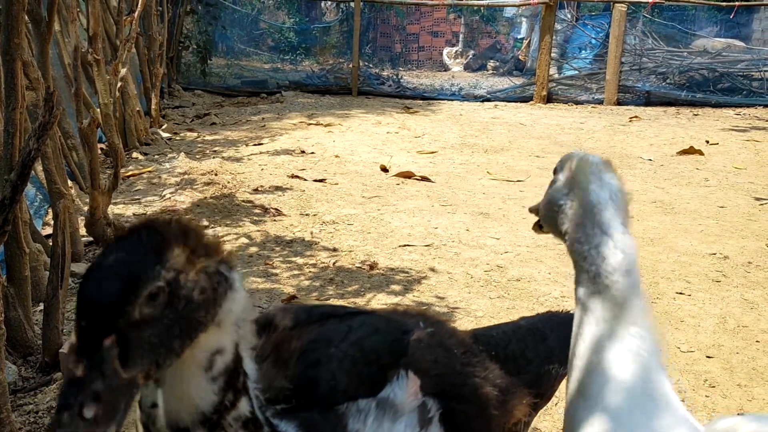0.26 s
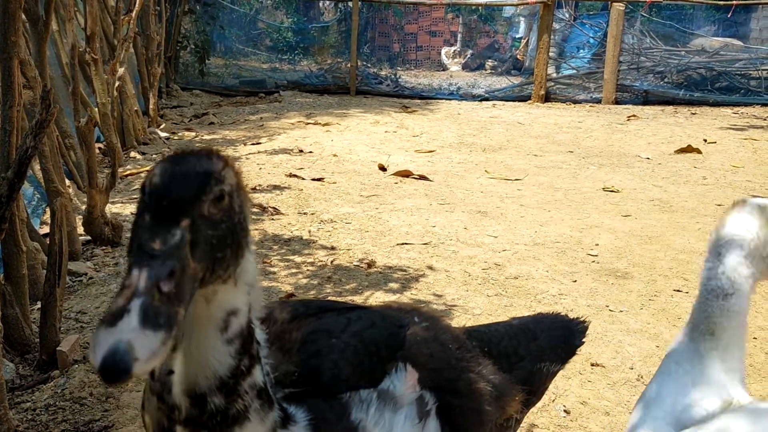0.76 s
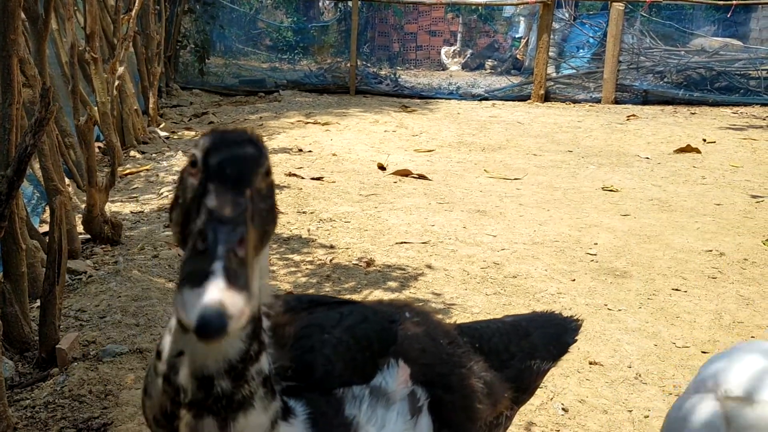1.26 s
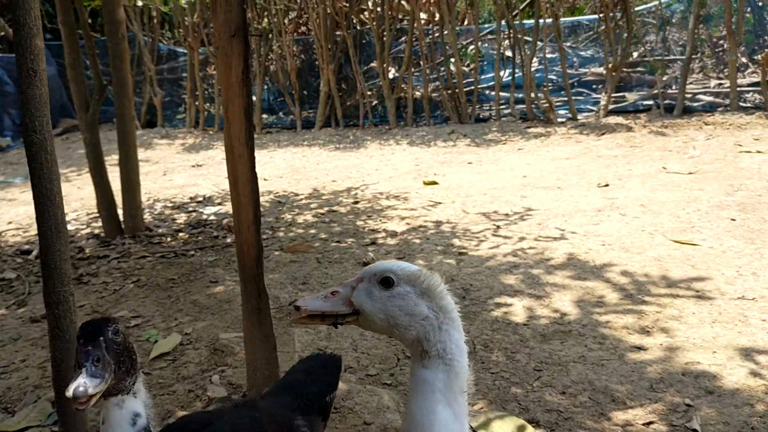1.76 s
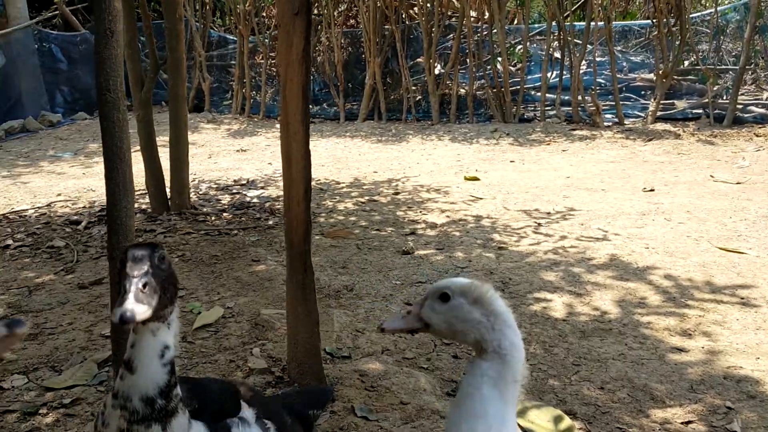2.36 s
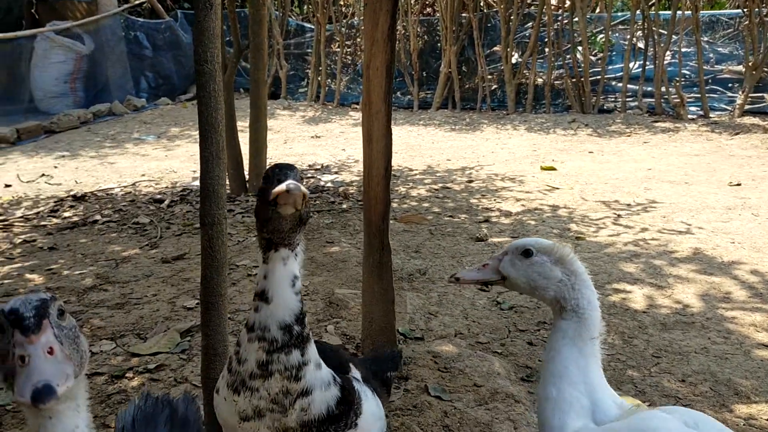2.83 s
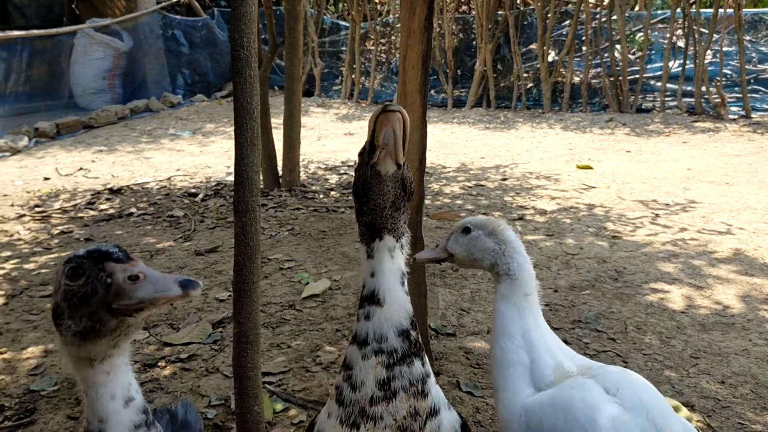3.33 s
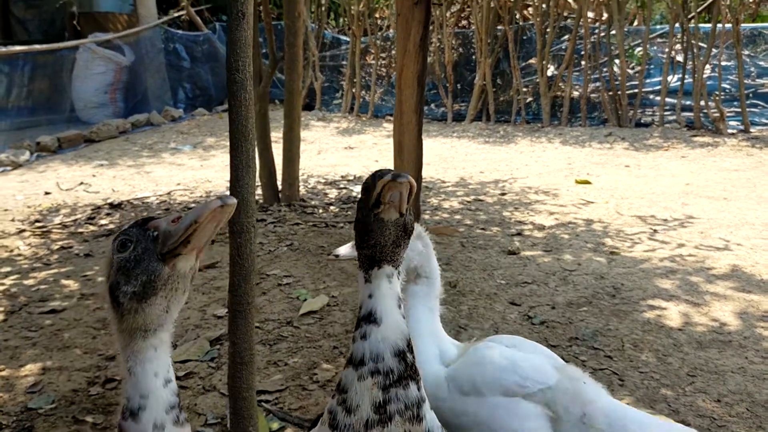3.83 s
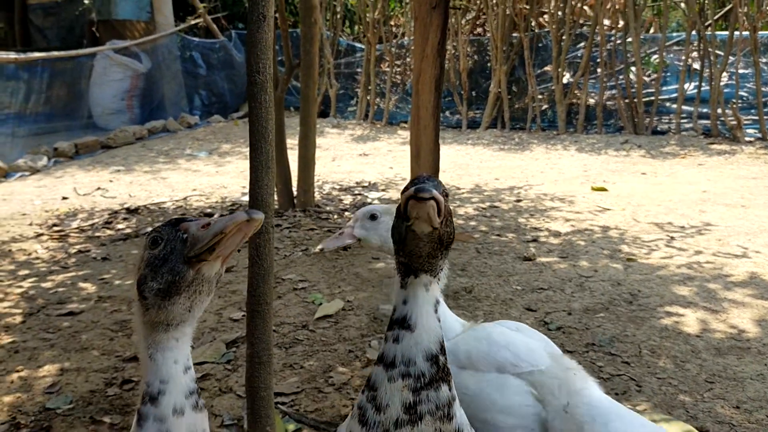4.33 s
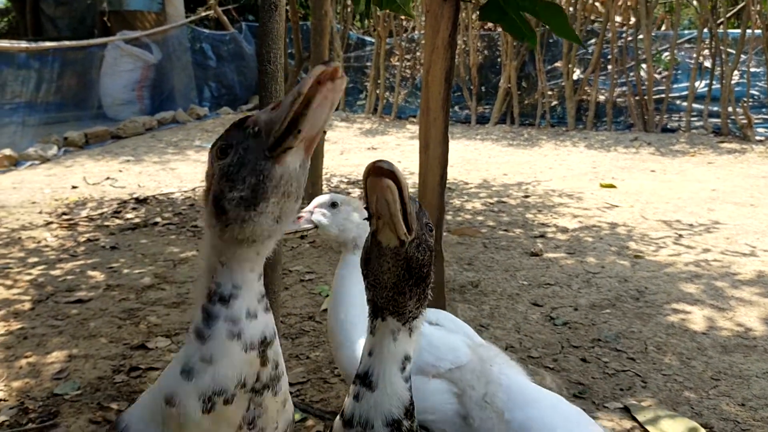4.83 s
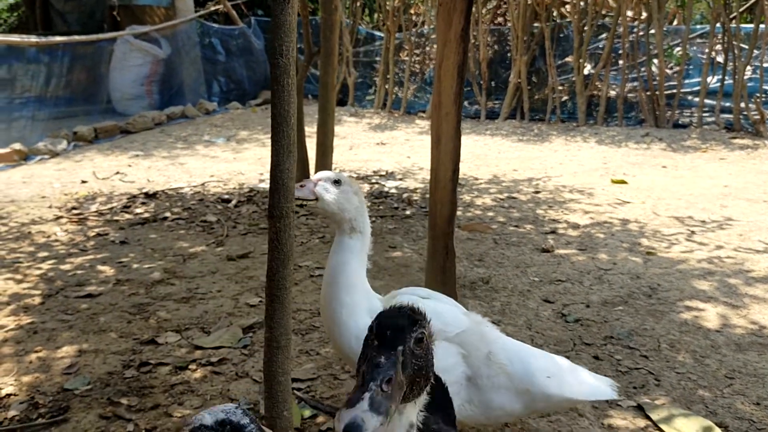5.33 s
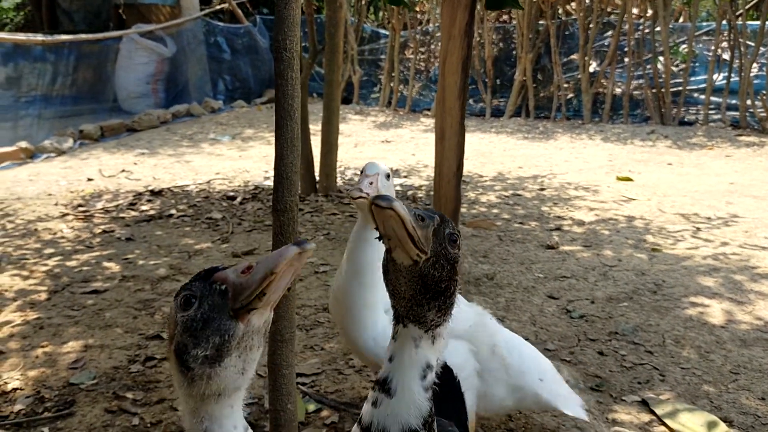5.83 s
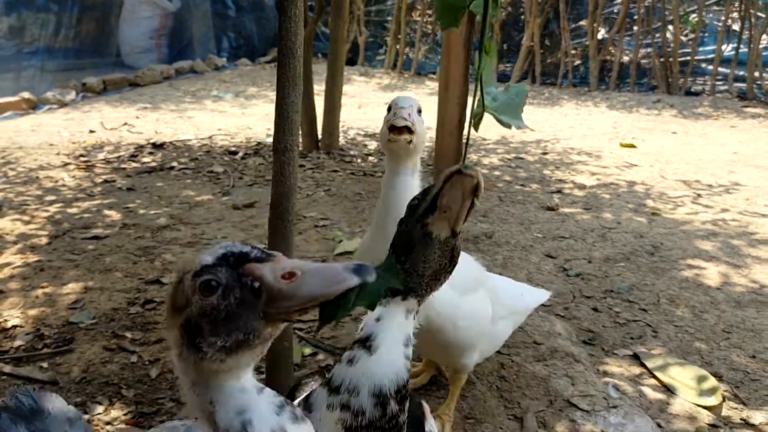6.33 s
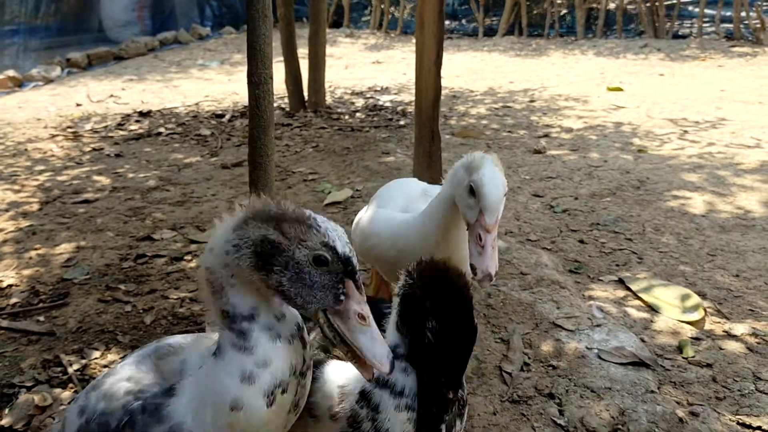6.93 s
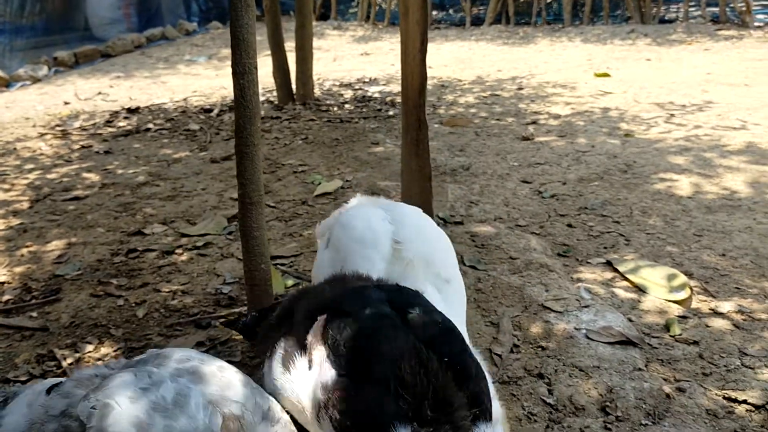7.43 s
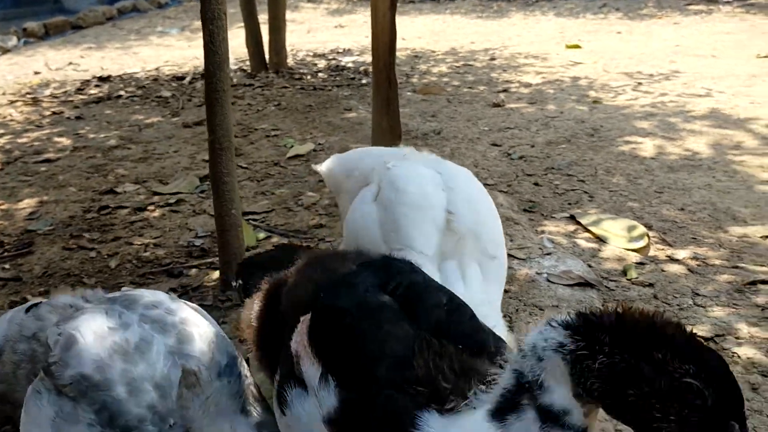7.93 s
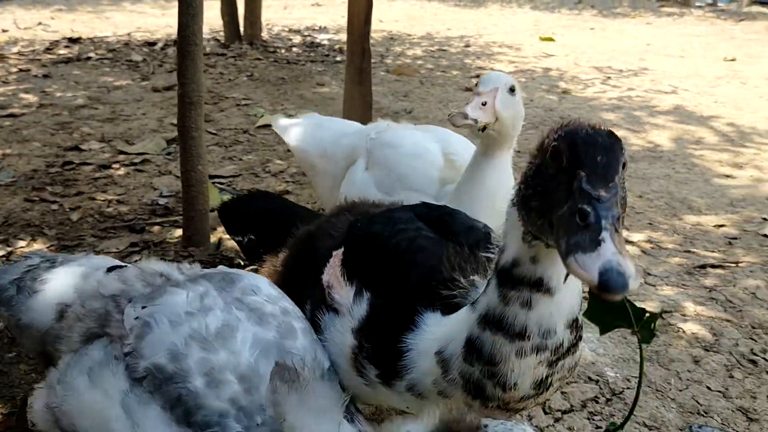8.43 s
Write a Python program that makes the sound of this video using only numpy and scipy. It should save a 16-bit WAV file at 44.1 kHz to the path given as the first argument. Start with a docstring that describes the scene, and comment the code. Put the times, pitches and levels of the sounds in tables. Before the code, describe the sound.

Close outdoor microphone in a dry yard. Ducks peep at the start over faint patter, then a click near 1.6 seconds brings a louder distant engine. A small bird alternates falling and rising notes, bills snap and leaves crinkle, loudest around five seconds with one piercing peep. The engine chugs nearer, booms briefly just before seven seconds and eases off amid more warbling peeps.

```python
"""Young ducks peep close by from the start, with fine patter underfoot and a faint one-cylinder engine.
After a click at 1.57 s the engine is louder; a small bird then repeats falling and rising notes,
bills snap among scuffed dry litter, and the engine chugs nearer, booms briefly and eases off.
Peeps, bird notes and hums are gliding sine waves; snaps, scuffs, click, patter and air are shaped noise;
the engine is a train of pulses mixed with noise."""
import sys
import numpy as np
from scipy import signal
from scipy.fft import rfft, irfft
from scipy.io import wavfile
from scipy.ndimage import uniform_filter1d

SR = 44100
rng = np.random.default_rng(int(sys.argv[2]) if len(sys.argv) > 2 else 0)


def inscribe(sig):
    """Save sig as 16-bit PCM at rate SR to the path in sys.argv[1].

    A 1-D sig is mono; a 2-D sig holds one channel per row.
    Samples are clipped to [-1, 1] before scaling.
    """
    pcm = np.round(np.clip(np.atleast_2d(sig).T, -1, 1) * 32767)
    wavfile.write(sys.argv[1], SR, pcm.astype(np.int16))


N = 382769

# Colour of bill snaps and leaf crinkles. Each row: frequency in Hz, relative level in dB.
SNAP_COLOUR = [(1500, -36), (3730, -5.5), (5220, -9.5), (6830, -3), (9370, -7.5), (14300, 0.5), (16000, 8)]
# Colour of the dull part of a blow. Each row: frequency in Hz, relative level in dB.
BODY_COLOUR = [(100, -1.5), (350, -3), (600, -6), (1200, 4.5), (1800, -1), (2800, -2.5)]


def undb(db):
    """Decibels to gain."""
    return 10 ** (np.asarray(db) / 20)


def unit(x):
    """Scale to an rms level of 1."""
    return x / np.sqrt(np.mean(x ** 2) + 1e-20)


def curves(rows):
    """Each column of a table joined by straight lines over the whole time."""
    s, *columns = np.transpose(rows)
    return [np.interp(np.arange(N) / SR, s, column) for column in columns]


def gain_at(hz, tone):
    """Gain of a (Hz, dB) colour, falling steeply beyond its ends."""
    f, db = np.transpose(tone)
    hz = np.maximum(hz, 1)
    inside = undb(np.interp(np.log(hz), np.log(f), db))
    beyond = np.minimum(1, np.minimum(hz / f[0], f[-1] / hz)) ** 3
    return inside * beyond


def colour(x, tone, size=8192):
    """Filter with the given colour and no sound ahead of time; white noise keeps its level."""
    cepstrum = irfft(np.log(gain_at(np.fft.rfftfreq(size, 1 / SR), tone) + 1e-5))
    # folding the cepstrum onto positive times makes the filter respond at once
    cepstrum[1:size // 2] *= 2
    cepstrum[size // 2 + 1:] = 0
    response = irfft(np.exp(rfft(cepstrum)))
    return signal.fftconvolve(x, response / np.linalg.norm(response))[:len(x)]


def walk(rate):
    """Random wander of rms 1, with about rate turning points a second."""
    knots = rng.standard_normal(int(N / SR * rate) + 2)
    return unit(np.interp(np.arange(N) / SR * rate, np.arange(len(knots)), knots))


def bell(s, half):
    """A smooth swell of height 1 around time s."""
    return np.exp(-((np.arange(N) / SR - s) / half) ** 2)


def add(out, s, x):
    """Mix a sound in at time s."""
    i = max(int(s * SR), 0)
    out[i:i + len(x)] += x[:max(N - i, 0)]


def glide(rows, size=220):
    """Pitch and envelope of a whistle through its turning points, with rounded corners."""
    s, hz, db = np.transpose(sorted(rows))
    t = np.arange(s[0], s[-1], 1 / SR)
    fade = np.clip(np.minimum(t - s[0], s[-1] - t) / 0.0012, 0, 1)
    pitch = uniform_filter1d(np.interp(t, s, hz), 2 * size, mode="nearest")
    level = undb(uniform_filter1d(np.interp(t, s, db), size // 2, mode="nearest"))
    return pitch, fade * level


def yard(x, t60, wet_db):
    """Fence, trunks and leaves scatter a thin tail behind the sound, dying by 60 dB in t60 seconds."""
    t = np.arange(SR) / SR
    tail = rng.standard_normal(SR) * undb(-60 * t / t60) * (t > .008)
    return x + undb(wet_db) * signal.fftconvolve(x, tail / np.linalg.norm(tail))[:N]


def ducks(count=6):
    """Warbling whistles whose hoarse overtones slide through the throat's resonances; harder calls are brighter."""
    # Throat and bill colour. Each row: frequency in Hz, gain in dB.
    throat = [(2000, 3.5), (2500, -0.5), (2670, -1), (2810, -5), (4500, -13.5), (5800, -19.5), (6700, -30),
              (8600, -19), (11000, -25), (16000, -21)]
    # late on, the voice splits at the top of a peep: a partial at one and a half times the pitch
    split_from_s, split_above_hz, split_db = 7.09, 2850, -17.5
    hoarse_rad = .22  # phase roughness, multiplied by the overtone's number
    pitch, effort, overtone_level = peeping()
    on = np.flatnonzero(effort)
    hz = pitch[on]
    waver = 0.0084 * walk(700)[on]
    flutter = undb(2.5 * walk(220)[on])
    split_height = np.clip((hz - split_above_hz) / 20, 0, 1)
    split = (on / SR > split_from_s) * split_height * undb(split_db + 2.8 * walk(50)[on])
    phase = 2 * np.pi * np.cumsum(hz * (1 + waver)) / SR
    whistle = gain_at(hz, throat) * (np.sin(phase) + split * np.sin(phase + phase / 2))
    grit = walk(1100)[on]
    overtones = 0
    for k in range(2, count + 1):
        partial = np.sin(k * phase + hoarse_rad * k * grit)
        overtones = overtones + gain_at(k * hz, throat) * partial * (1 + 0.33 * walk(900)[on])
    bright = np.sqrt(np.minimum(effort[on] / undb(-53), 1))
    out = np.zeros(N)
    out[on] = flutter * (effort[on] * whistle + overtone_level[on] * bright * overtones)
    return yard(out, t60=0.11, wet_db=-16.5)


def peeping():
    """Pitch, effort and overtone strength of the ducks' voice; peeps that touch run together into a warble."""
    # Each row: top of the pitch in seconds, rise in seconds, fall in seconds, top pitch in Hz,
    # effort in dB, loudest moment in seconds after the top, overtones in dB against the effort.
    peeps = [ (0.028, 0.03, 0.019, 2950, -35.5, -0.02, -6.5), (0.076, 0.033, 0.015, 2880, -35, -0.027, -5),
             (1.728, 0.035, 0.016, 2580, -45, -0.0036, 4), (1.773, 0.032, 0.021, 2820, -35.5, -0.0065, 2),
             (2.028, 0.037, 0.02, 2570, -40, -0.0054, 4.5), (2.056, 0.019, 0.017, 2960, -38.5, -0.004, 7),
             (2.09, 0.012, 0.015, 2220, -46.5, -0.0021, 2), (4.1, 0.019, 0.017, 2475, -42, 0.035, 6),
             (4.131, 0.018, 0.018, 2890, -27.5, -0.0095, -3.5),
             (4.174, 0.026, 0.018, 2916, -26.5, -0.013, -0.5),
             (5.119, 0.028, 0.018, 2595, -40.5, 0.0093, -15),
             (5.156, 0.022, 0.033, 2880, -32, -0.0071, -12),
             (5.199, 0.022, 0.018, 2875, -13.5, -0.0042, -10), (7.075, 0.032, 0.018, 3240, -33, -0.0028, 2),
             (7.112, 0.029, 0.027, 2980, -24.5, -0.0009, -8), (7.156, 0.027, 0.026, 2960, -23, -0.009, -14),
             (7.199, 0.033, 0.021, 2940, -30.5, -0.0026, -1.5),
             (7.498, 0.011, 0.016, 2914, -34.5, -0.0012, -7),
             (7.523, 0.013, .025, 2504, -36.5, -0.0018, -16), (7.598, 0.033, 0.018, 2920, -34, -0.01, 1.5),
             (7.639, 0.019, 0.02, 2864, -35.5, -0.0035, -13), (7.685, 0.027, 0.024, 2963, -34, -0.0073, 2),
             (7.741, 0.03, 0.0171, 2586, -36.5, -0.0042, -20)]
    # One-way chirps. Each row: start in seconds, length in seconds, first pitch in Hz, last pitch in Hz,
    # effort in dB, overtones in dB against the effort.
    chirps = [(0.592, 0.025, 3220, 2240, -40.5, -15), (.85, 0.021, 3370, 2300, -46, -23),
              (1.605, .075, 1846, 2620, -62.5, -8), (5.39, 0.035, 1996, 3490, -40, -4),
              (5.475, 0.031, 2100, 3510, -39, -3.5), (5.532, 0.028, 2220, 3240, -46, -2)]
    # a peep arches up from the resting pitch and back, with soft ends
    rest_hz, arch_steepness, arch_power, edge_db, fade_s = 2173, 1.9, 2.4, -47.5, .003
    overtone_swell = 0.43  # power of the arch: overtones swell towards its top
    chirp_bend = 1.5  # a chirp is steepest at its high end
    hz, effort, overtones = np.full(N, float(rest_hz)), np.zeros(N), np.zeros(N)
    for s, rise, fall, top_hz, db, loudest, overtones_db in peeps:
        t = np.arange(max(-2 * rise, -s), 2 * fall, 1 / SR)
        arch = np.exp(-arch_steepness * np.abs(t / np.where(t < 0, rise, fall)) ** arch_power)
        add(hz, s + t[0], (top_hz - rest_hz) * arch)
        peak = np.clip(loudest, -rise, fall)
        off_peak = np.interp(t, [-rise, peak, fall], [-1, 0, 1])  # 0 where it is loudest
        fade = np.clip(np.minimum(t + rise, fall - t) / fade_s + .5, 0, 1)
        push = fade * undb(db - max(db - edge_db, 11) * off_peak ** 2)
        add(effort, s + t[0], push)
        add(overtones, s + t[0], push * undb(overtones_db) * arch ** overtone_swell)
    for s, length, first_hz, last_hz, db, overtones_db in chirps:
        n = int(length * SR)
        ramp = np.linspace(0, 1, n) if last_hz > first_hz else np.linspace(1, 0, n)
        height = ramp ** chirp_bend
        add(hz, s, min(first_hz, last_hz) - rest_hz + abs(last_hz - first_hz) * height)
        push = undb(db) * signal.windows.tukey(n, .5)
        add(effort, s, push)
        add(overtones, s, push * undb(overtones_db))
    return hz, effort, overtones


def cluck():
    """A hoarse low note broken into bursts, each bending upward, with a rough upper resonance above it."""
    # Each row: start in seconds, length in seconds, pitch in Hz, level in dB,
    # upper resonance in Hz, its level in dB against the pitch.
    bursts = [(2.266, 0.017, 770, -53, 1940, 5.5), (2.279, .02, 922, -42, 2700, -7),
              (2.303, 0.027, 1017, -47.5, 2360, -8)]
    out = np.zeros(N)
    rasp, grate, rattle = .09 * walk(1200), .1 * walk(2000), undb(3 * walk(400))
    for s, length, hz, db, upper_hz, upper_db in bursts:
        n = int(length * SR)
        here = int(s * SR) + np.arange(n)
        bend = 1 + 0.19 * np.linspace(-.5, .5, n)
        low = np.sin(2 * np.pi * np.cumsum(hz * (bend + rasp[here])) / SR)
        upper = np.sin(2 * np.pi * np.cumsum(upper_hz * (bend + grate[here])) / SR)
        envelope = undb(db) * signal.windows.tukey(n, .5) * rattle[here]
        add(out, s, envelope * (low + undb(upper_db) * upper))
    return yard(out, t60=0.06, wet_db=-10)


def snaps():
    """A bill closes or a stalk breaks: a sharp pulse with a brief crackle, and a duller knock that rings."""
    # Each row: start in seconds, level in dB, body in dB against the treble.
    blows = [(2.354, -30.5, -26), (2.378, -33.5, -9.5), (2.857, -38, -3.5), (3.272, -32, -39),
             (3.38, -30, -36), (3.51, -31, -27), (4.466, -26, -13.5), (4.851, -27, -12.5),
             (4.8738, -22, -20), (4.89, -22, -24), (5.016, -24, -32), (5.0206, -20, -24),
             (5.0732, -17, -29), (6.24, -25, -13.5), (6.281, -25, -22), (8.322, -26, -18),
             (8.449, -27.5, -15.5)]
    ring_hz, ring_decay_s, ring_db = 3870, 0.00048, 14.5  # ring level is against the body
    # the hardest snap also sets off a low hollow knock
    hollow_s, hollow_hz, hollow_db, hollow_decay_s = 5.076, 430, -38, 0.0047
    crack, knock, ring = np.zeros(N), np.zeros(N), np.zeros(N)
    t = np.arange(SR // 20) / SR
    for s, db, body_db in blows:
        blow = 4.4 * (t == 0) + np.exp(-t / 0.0023) * rng.standard_normal(len(t))
        add(crack, s, undb(db) * blow)
        add(knock, s, undb(db + body_db) * blow)
        ringing = np.exp(-t / ring_decay_s) * np.sin(2 * np.pi * ring_hz * t)
        add(ring, s, undb(db + body_db + ring_db) * ringing)
    hollow = np.exp(-t / hollow_decay_s) * np.sin(2 * np.pi * hollow_hz * t)
    add(ring, hollow_s, undb(hollow_db) * hollow)
    return colour(crack, SNAP_COLOUR) + colour(knock, BODY_COLOUR) + ring


def scuffs_and_click():
    """Bursts of grainy noise: dry leaves and grit are brushed; the one at 1.567 s is only a short click."""
    # Each row: peak in seconds, level in dB, rise in seconds, decay in seconds, body in dB against the treble.
    # The row at 1.567 s is the click, the others are scuffs.
    bursts = [(1.475, -43.5, 0.0032, 0.0085, -25), (1.567, -27.5, 0.00085, 0.0039, -16.5),
              (1.807, -32, 0.014, 0.0094, -9.5), (1.822, -36.5, 0.0051, 0.02, -13.5),
              (1.921, -37, 0.011, 0.0092, -18.5), (2.372, -42, 0.0087, 0.031, -7.5),
              (3.081, -43, 0.0019, 0.014, -10.5), (3.426, -35.5, 0.021, 0.032, -15),
              (3.496, -22, 0.0036, 0.011, -12), (4.401, -37, 0.0029, 0.0037, -6),
              (5.077, -34, 0.00047, 0.0068, -4.5), (6.204, -36.5, 0.035, 0.019, -14),
              (6.28, -43.5, 0.044, 0.1, -6), (8.312, -20.5, 0.0019, 0.0056, -19.5)]
    # Colour of dry litter, lent to the click too. Each row: frequency in Hz, relative level in dB.
    litter_colour = [(1500, -18.5), (2910, -4), (4370, -1.5), (4830, -12), (6760, -2.5), (8570, -6.5),
                     (15100, 2.5)]
    crisp, dull = np.zeros(N), np.zeros(N)
    t = np.arange(-SR // 5, SR // 4) / SR
    for s, db, rise, decay, body_db in bursts:
        envelope = undb(db) * np.exp(-np.abs(t) / np.where(t < 0, rise, decay))
        add(crisp, s + t[0], envelope)
        add(dull, s + t[0], envelope * undb(body_db))
    grain = unit(undb(3.2 * walk(700)))
    crisp_noise = colour(crisp * grain * rng.standard_normal(N), litter_colour)
    return crisp_noise + colour(dull * grain * rng.standard_normal(N), BODY_COLOUR)


def bird():
    """Two pure notes in turn, a little different each time, smeared by the trees; the rising one most."""
    # Starts of the rising and of the falling notes, in seconds.
    rise_starts, fall_starts = [2.365, 2.743, 3.109, 3.511, 3.914, 4.308, 4.772, 5.154, 5.532, 5.957, 6.35,
                                7.24], [2.112, 2.499, 2.876, 3.26, 3.647, 4.041, 4.447, 4.902, 5.29,
                                               5.676, 6.082, 6.944, 7.395]
    # Their shapes. Each row: seconds into the note, pitch in Hz, level in dB.
    rise_shape, fall_shape = [(0, 2433, -60), (.011, 3640, -52.5), (0.023, 4660, -51.5), (.036, 5450, -52),
                              (0.047, 5280, -74)], [(0, 3790, -79), (.014, 3400, -49), (.052, 2982, -46.5),
                                            (0.08, 2670, -62.5)]
    faint_from_s, faint_db = 6.25, -2.5  # the last notes are fainter
    rising, falling = np.zeros(N), np.zeros(N)
    for out, starts, shape in ((rising, rise_starts, rise_shape), (falling, fall_starts, fall_shape)):
        hz, envelope = glide(shape)
        for s, chance in zip(starts, rng.standard_normal(len(starts))):
            note = np.sin(2 * np.pi * np.cumsum(hz * (1 + 0.0073 * chance)) / SR)
            add(out, s, undb(faint_db * (s > faint_from_s)) * envelope * note)
    return yard(rising, t60=0.45, wet_db=-0.5) + yard(falling, t60=0.4, wet_db=-4.5)


def engine():
    """Firings thump and bark from the exhaust, metal clatters in step, the casing rings; most fade with distance."""
    # Each row: time in seconds, firings per second.
    speed = [(1.7, 22.8), (3.4, 23.4), (4.05, 24.1), (5.46, 24.7), (6.3, 25.3), (6.6, 25.9), (7.1, 26.1),
             (8.68, 25.5)]
    # Level of the deep thump. Each row: time in seconds, level in dB.
    thump_level = [(0.0, -78), (6.02, -54), (6.41, -63), (6.58, -48.5), (6.89, -44.5), (8.0, -55),
                   (8.27, -53)]
    # Bark's upper half against its lower half. Each row: time in seconds, extra level in dB.
    bark_tilt = [(5.3, 5), (6.1, 8), (6.85, 5.5), (7.45, 8.5), (8.2, 10.5)]
    # Colours of the bark, the clatter and the casing's hollow ring. Each row: frequency in Hz, relative level in dB.
    bark_colour, clatter_colour, casing_colour = [(65, -25.5), (100, 3.5), (130, 5.5), (180, -1.5),
                                                  (300, -16), (700, -44)], [(300, -3), (440, -8), (745, -8),
                                                                     (1040, -10.5), (2380, -5),
                                                                     (5100, -19.5), (7500, -24)], [(700, -29.5),
                                                                                           (850, 4),
                                                                                           (1060, 4.5),
                                                                                           (1280, -6),
                                                                                           (1600, 1.5),
                                                                                           (1850, -24)]
    # Running hums. Each row: frequency in Hz at hum_rate firings per second, level in dB at the closest point.
    hums, hum_rate = [(403, -59.5), (1065, -61), (1595, -59.5)], 26
    # steady pass: time and distance of the closest point, and pace in metres per second
    pass_s, pass_m, pace_m_s = 7.24, 7.97, 10.13
    faint_until_s, faint_db = 1.57, -17  # until then all but the thump is fainter
    # brief boom of the bark; clatter and casing rise by half as many dB
    boom_s, boom_half_s, boom_db = 6.77, 0.25, 5.5
    bark_db, clatter_db, casing_db = -47.5, -47, -51.5  # at the closest point, before the boom
    clatter_falloff, casing_falloff = 1.167, 1.74  # powers of the distance: these carry less far
    gas_db = -13  # hiss of exhaust gas against the firings

    rate, = curves(speed)
    t = np.arange(N) / SR
    near = pass_m / np.hypot(pass_m, pace_m_s * (t - pass_s)) * undb(faint_db * (t < faint_until_s))
    cycles = np.cumsum(rate) / SR
    fired = np.flatnonzero(np.diff(np.floor(cycles)))
    pulses = np.zeros(N)
    pulses[fired] = undb(0.33 * rng.standard_normal(len(fired)))
    gas = unit(pulses) + undb(gas_db) * rng.standard_normal(N)

    deep = colour(gas, [(22, -35), (36, -11.5), (51, -1.5), (75, -20.5)])
    thump = unit(deep) * undb(curves(thump_level)[0])
    boom = undb(boom_db * bell(boom_s, boom_half_s))
    bark = unit(colour(gas, bark_colour)) * undb(bark_db) * boom
    lower = signal.sosfiltfilt(signal.butter(4, 140, fs=SR, output="sos"), bark)
    tilt = undb(curves(bark_tilt)[0] / 2)  # half the tilt goes to each side
    bark = lower / tilt + (bark - lower) * tilt

    hum = 0
    for hz, db in hums:
        level = undb(db + 2 * walk(10))
        hum = hum + level * np.sin(2 * np.pi * hz * cycles / hum_rate + walk(17))
    beat = 1 + .5 * np.exp(-(cycles % 1) / 0.96)  # a little louder at each firing
    rattling = rng.standard_normal(N) * beat * undb(1.07 * walk(9))
    clatter = unit(colour(rattling, clatter_colour)) * undb(clatter_db) * np.sqrt(boom)
    casing = unit(colour(rng.standard_normal(N) * beat, casing_colour)) * undb(casing_db) * np.sqrt(boom)
    return thump + near * bark + near ** clatter_falloff * clatter + near ** casing_falloff * (casing + hum)


def patter():
    """Fine crackle of feet and feathers, coming in little flurries, with brief bright crinkles of single leaves."""
    # Flurries. Each row: peak in seconds, level in dB, half length in seconds.
    flurries = [(1.09, -64.5, 0.18), (2.1, -64.5, 0.46), (3.1, -59, 0.2), (4.44, -62, 0.63),
                (5.058, -55.5, .16), (5.55, -56, 0.33), (6.66, -49, 0.35), (7.7, -49, 0.5),
                (8.37, -45.5, 0.21)]
    # The loudest crinkles. Each row: middle in seconds, level in dB.
    loud_crinkles = [(0.62, -48.5), (2.957, -41), (4.935, -34.5), (5.326, -38.5), (5.651, -38.5),
                     (6.8, -33.5), (7.947, -40), (8.287, -38), (8.365, -33)]
    # Colour of the patter. Each row: frequency in Hz, relative level in dB.
    patter_colour = [(3500, -3.5), (5100, -10), (7100, -3), (9400, -7), (14800, 1), (16000, 0)]
    steady_db = -79  # faint patter under the flurries
    grain_db, step_db, shuffle_db = 3, 2, 1.2  # spread of level between grains, steps and shuffles
    # chance crinkles: how many a second, length, spread of level, level against the patter
    crinkle_rate, crinkle_s, crinkle_spread_db, crinkle_db = 45, .007, 4, -3
    power = undb(steady_db) ** 2 + sum(undb(db) ** 2 * bell(s, half) for s, db, half in flurries)
    activity = np.sqrt(power)
    roughness = undb(grain_db * walk(1200) + step_db * walk(90) + shuffle_db * walk(12))
    grains = unit(rng.standard_normal(N) * roughness)
    burst = np.hanning(int(crinkle_s * SR))
    strength = undb(crinkle_spread_db * np.clip(rng.standard_normal(N), -2, 2))
    starts = (rng.random(N) < crinkle_rate / SR) * strength
    crinkles = unit(signal.fftconvolve(starts, burst, "same")) * undb(crinkle_db) * activity
    for s, db in loud_crinkles:
        add(crinkles, s - crinkle_s / 2, undb(db) * burst)
    crinkle_noise = colour(crinkles * rng.standard_normal(N), SNAP_COLOUR)
    return colour(grains, patter_colour) * activity + crinkle_noise


def air():
    """Quiet outdoor background: coloured noise whose level wanders slowly."""
    # Each row: frequency in Hz, relative level in dB.
    air_colour = [(25, -3), (60, -19), (400, -38), (2600, -38), (6000, -49), (16000, -69)]
    return unit(colour(rng.standard_normal(N), air_colour)) * undb(-62 + 2.5 * walk(3.4))


def scene():
    """Everything in the yard, in one channel."""
    feeding = yard(snaps() + scuffs_and_click(), t60=0.16, wet_db=-18.0)
    return (ducks() + cluck() + feeding + bird() + engine() + patter() + air())[None]


def record(dry):
    """A steep low-pass filter cuts the top of the treble, above 15900 Hz."""
    return signal.sosfilt(signal.ellip(10, .2, 70, 15900, fs=SR, output="sos"), dry)


dry = scene()
out = record(dry)
inscribe(out)
```